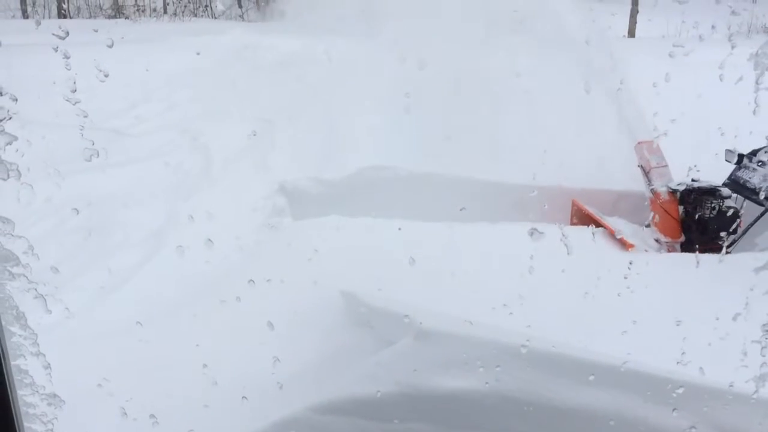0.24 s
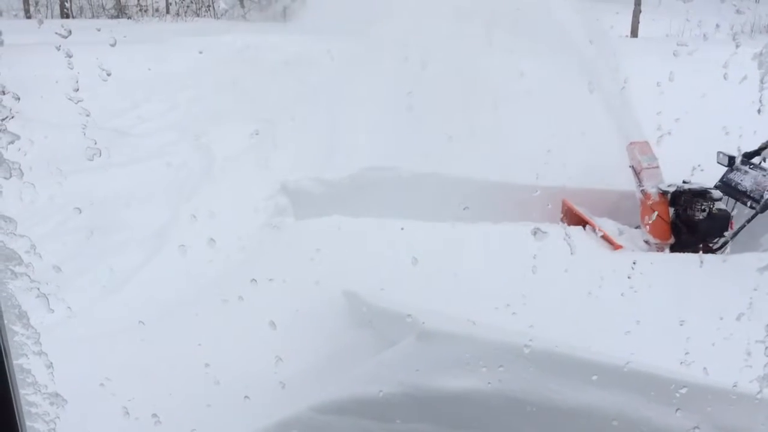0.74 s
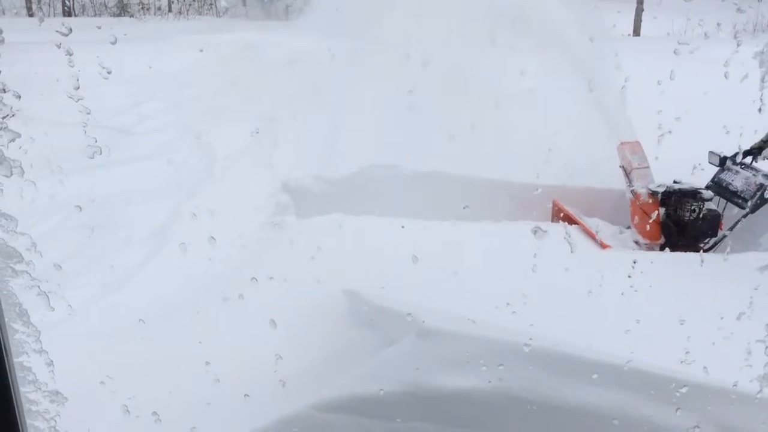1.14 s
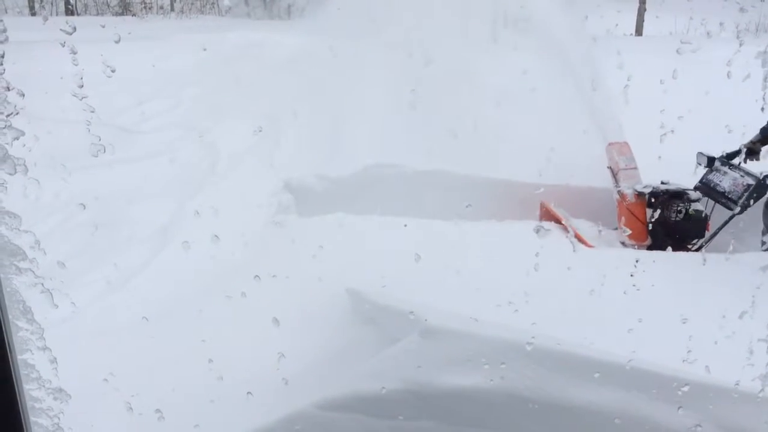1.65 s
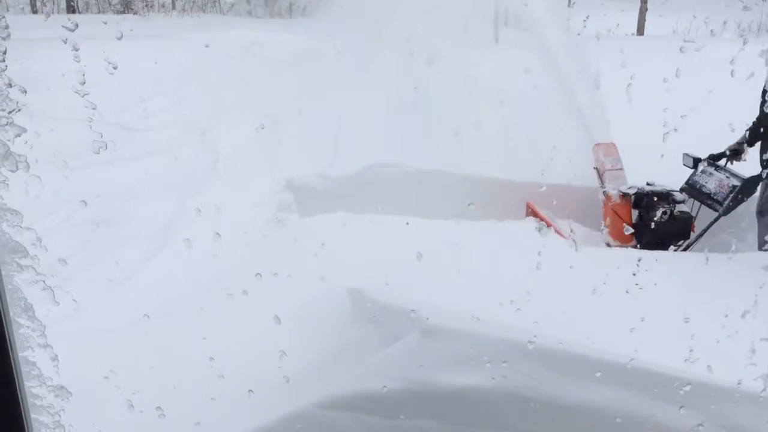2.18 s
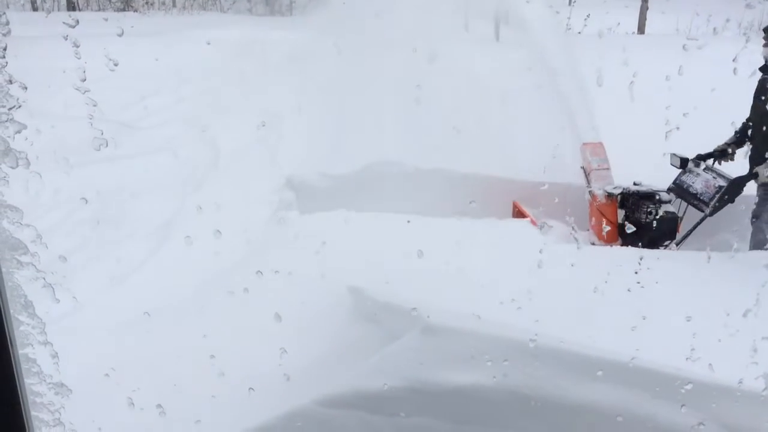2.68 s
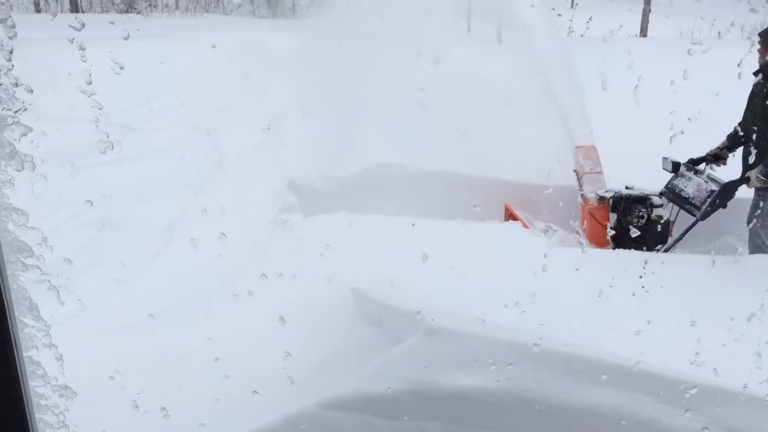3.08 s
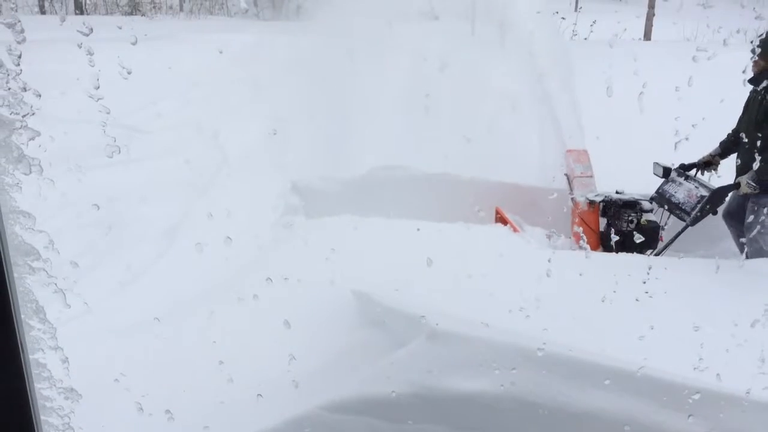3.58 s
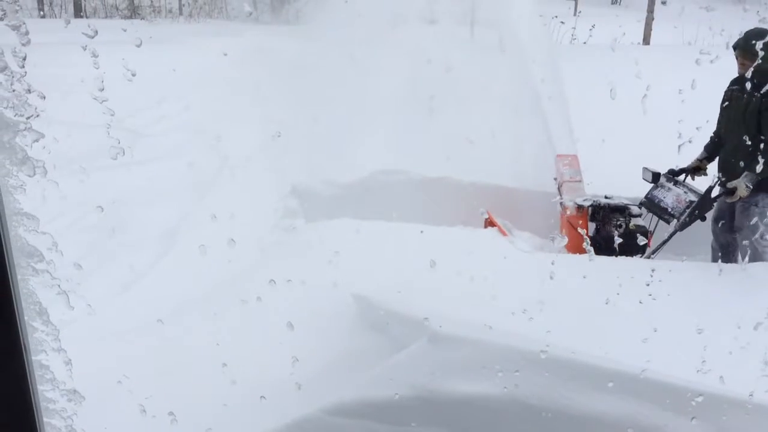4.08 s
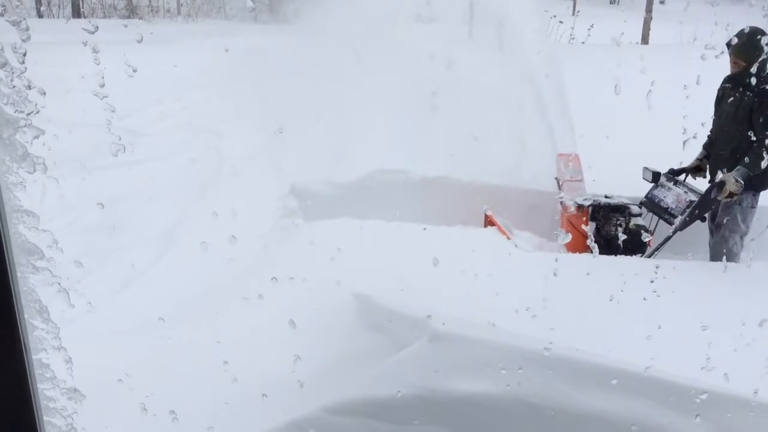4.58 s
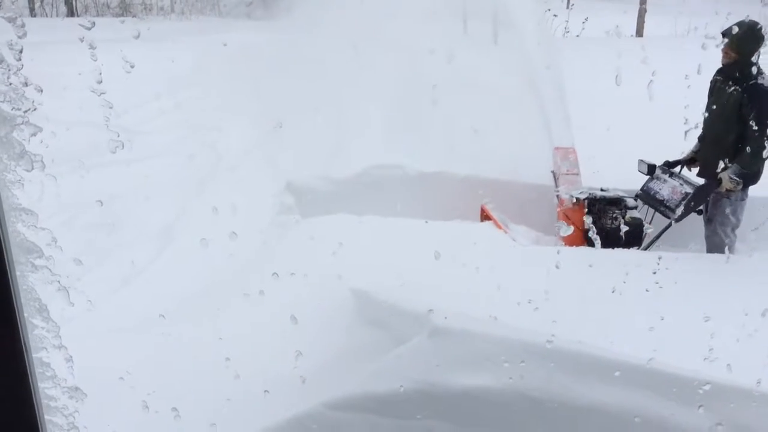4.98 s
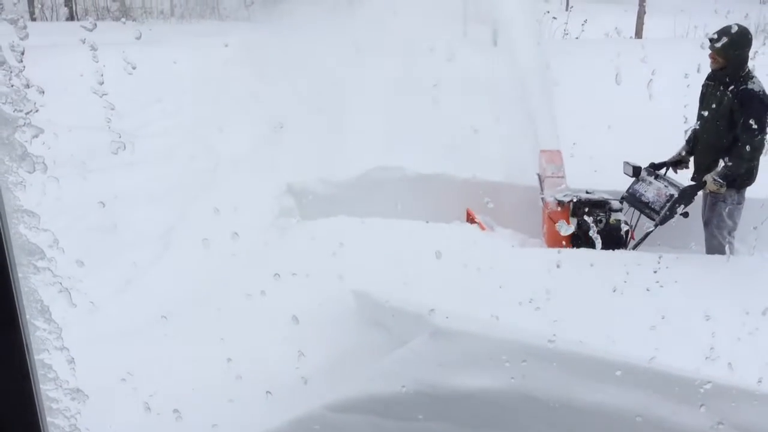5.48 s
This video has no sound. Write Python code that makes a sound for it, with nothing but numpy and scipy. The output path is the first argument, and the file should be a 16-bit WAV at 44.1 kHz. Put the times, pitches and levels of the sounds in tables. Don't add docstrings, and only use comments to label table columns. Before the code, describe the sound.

A bassy, muffled snowblower drones outside a closed window, its rapid firing pulses fluttering slightly in speed. Snow rumbles through its casing, and impeller throb swells as it takes deep bites. Indoors there is soft air hiss, steady electrical hum and a faint high whistle growing midway. Close cloth brushes occur at the start and faintly later, then two quick flicks and an abrupt pop on the handheld microphone finish it.

```python
import sys
import numpy as np
from scipy import signal
from scipy.fft import rfft, irfft
from scipy.io import wavfile

SR = 44100
rng = np.random.default_rng(int(sys.argv[2]) if len(sys.argv) > 2 else 0)


def digitize_waveform(pressure):
    field = np.atleast_2d(pressure).T
    bounded = np.clip(field, -1, 1)
    quanta = np.round(bounded * 32767).astype(np.int16)
    wavfile.write(sys.argv[1], SR, quanta)


def makeup_ratio(level_db):
    decades = np.asarray(level_db, float) / 20
    return 10 ** decades


N = 253134
T = np.arange(N) / SR
HZ = np.fft.rfftfreq(N, 1 / SR) + 1e-3

# pitch_hz, level_db (per Hz)
AIR_HISS = [(2000, -4), (2470, -8), (3500, -5.5), (4170, -11.5), (5550, -15.5), (7100, -22.5),
            (8250, -13.5), (9360, -14), (10800, -20.5), (12300, -23), (13200, -30), (13900, -30),
            (14600, -41), (15400, -44)]
# pitch_hz, width_hz, level_db
WHINES = [(340, 3, -75), (360, 3, -81), (559, 7, -74), (824, 8, -82), (1043, 6, -87), (1114, 8, -84),
          (2007, 4, -86), (2230, 5, -94), (3510, 5, -95), (4404, 5, -101)]
# start_s, length_s, pitch_hz, width_hz, level_db
RUSTLES = [
    (0.0, .03, 9000, 4000, -80),
    (.078, .04, 9300, 3500, -75.5),
    (.082, .03, 4800, 2600, -77),
    (.12, .04, 8800, 4500, -78),
    (1.62, .03, 11000, 5000, -88),
    (3.128, .035, 12800, 5000, -87.5),
    (3.13, .03, 5500, 2500, -86),
    (5.562, .012, 9800, 3000, -78),
    (5.6, .012, 10000, 5000, -82),
]
# pitch_hz, level_db (per Hz)
ROAR = [(12, -43), (33, -29), (46, -7), (67, -16), (90, -7.5), (140, -14), (200, -12.5), (320, -21),
        (350, -24.5), (560, -24.5), (700, -27), (1160, -30.5), (1290, -33.5), (3100, -46)]
# pitch_hz, width_hz, level_db
CASING_RINGS = [(96.7, 10, -67.5), (132, 8, -66.5), (171.2, 13, -64.5), (229.3, 14, -72.5),
                (268, 19, -73.5), (301.3, 17, -71), (337, 9, -76.5), (426.3, 15, -74.5), (521, 11, -82),
                (615, 40, -73.5), (666, 22, -81.5), (738, 41, -81.5), (920, 14, -88), (938, 16, -86),
                (1185, 12, -86.5), (1210, 15, -91), (1400, 25, -82.5), (1525, 25, -83), (1950, 36, -89),
                (3753, 36, -87), (4330, 120, -95.5)]
# time_s, blade_rate_hz
IMPELLER_SPEED = [(0.0, 41.6), (0.8, 42.1), (1.3, 40.23), (2.0, 39.8), (2.5, 41.0), (3.6, 41.8),
                  (4.0, 41.5), (4.8, 43.1), (5.74, 43.7)]
# start_s, length_s, blade_level_db, double_level_db
BITES = [
    (1.7, 0.9, -70, -57),
    (2.2, 1.2, -65, -59.5),
    (3.001, 1.64, -62.5, -57),
    (4.952, 0.69, -63, -65),
]
# pitch_hz, width_hz, start_level_db, end_level_db
MUFFLER_SHELL = [(8280, 200, -1.5, -11), (9050, 140, 0.5, -4), (9650, 160, 0, -10.5), (10370, 180, -8, -8),
                 (11880, 370, -13, -4), (12150, 190, -7, -14)]
# place_in_cycle (0-1), level_db
VALVE_TICKS = [
    (.13, -101),
    (.27, -99),
    (.52, -97),
]
# time_s, firing_rate_hz
ENGINE_SPEED = [(0.0, 25.63), (0.2, 26.0), (0.6, 25.52), (0.8, 24.97), (1.4, 24.45), (1.8, 25.57),
                (2.0, 25.69), (2.4, 25.49), (2.8, 25.57), (3.0, 25.76), (3.4, 25.71), (4.0, 24.91),
                (4.4, 25.19), (5.0, 26.64), (5.2, 26.74), (5.6, 26.19), (5.74, 26.83)]
# multiple, top_level_db, pitch_hz, width_hz
STRONG_ORDERS = [(2, -54.5, 53.8, 4), (4, -58, 101, 24), (6, -57.5, 152.5, 14)]
# multiple, level_db
WEAK_ORDERS = [(1, -78), (3, -68), (5, -66.5), (7, -70), (8, -81), (9, -72), (10, -72), (11, -75),
               (12, -73), (13, -76), (15, -87), (17, -86), (20, -85), (21, -85), (23, -84)]
# pitch_hz, width_hz, lift_db
PANE = [(80, 4, 6), (174, 11, 7), (222, 11, 12), (271, 8, 11.5)]
# pitch_hz, level_db
MICROPHONE = [(12300, 0), (13200, -3), (13900, 1.5), (14600, -2), (16000, -2.5)]


def level(x, db):
    return x * makeup_ratio(db) / np.sqrt(np.mean(x ** 2))


def curve(table):
    time_s, value = np.transpose(table)
    return np.interp(T, time_s, value)


def noise(gain):
    return level(irfft(rfft(rng.standard_normal(N)) * gain, N), 0)


def resonance(hz, width_hz):
    return 1 / np.sqrt(1 + ((HZ - hz * hz / HZ) / width_hz) ** 2)


def walk(rate_hz):
    return noise(np.exp(-(HZ / rate_hz) ** 2))


def flickering_noise(spectrum, low_hz, high_hz, flicker_db, rate_hz):
    hz, db = np.transpose(spectrum)
    shape = makeup_ratio(np.interp(np.log(HZ), np.log(hz), db))
    out = 0
    for centre in np.arange(np.log2(low_hz), np.log2(high_hz) + .5, .5):
        share = np.cos(np.pi * np.clip(np.log2(HZ) - centre, -.5, .5))
        band = irfft(rfft(rng.standard_normal(N)) * shape * share, N)
        out = out + band * makeup_ratio(flicker_db * walk(rate_hz))
    return level(out, 0)


def indoors():
    hum_level = makeup_ratio(-55.5 + 0.33 * walk(0.86))
    out = hum_level * np.sqrt(2) * np.cos(2 * np.pi * 120.064 * T + .6)
    for hz, width, db in WHINES:
        loudness = makeup_ratio(db + 2.4 * walk(2 * width))
        drift = 1.33 * walk(width / 2)
        out = out + loudness * np.sqrt(2) * np.sin(2 * np.pi * hz * T + drift)
    whistle = noise(resonance(10379, 30) + resonance(10418, 30))
    sets_in = np.clip((T - 2.2) / 1.1, .15, 1)
    air = flickering_noise(AIR_HISS, 1955, 16000, 1.0, 17)
    return out + makeup_ratio(-93) * sets_in * whistle + level(air, -75.5)


def rustles():
    out = 0
    for start, length, hz, width, db in RUSTLES:
        progress = np.clip((T - start) / length, 0, 1)
        stroke = np.sin(np.pi * progress ** 0.52)
        grain = makeup_ratio(4.9 * walk(150))
        out = out + makeup_ratio(db) * stroke * grain * noise(resonance(hz, width) ** 2)
    return out


def finger_pop():
    since = T - 5.64995
    after = np.maximum(since, 0)
    press = .031 * np.clip(1 + since / .0072, 0, 1) ** .7
    wobble = .38 * np.exp(-after / .0012) * np.cos(2 * np.pi * 900 * (after - .00042))
    suck = .052 * (np.clip(1 - after / .0056, 0, 1) + wobble)
    snap = 1 - np.exp(-np.maximum(since + .00003, 0) / .00018)
    tick_shape = np.exp(-((since + .00002) / .00008) ** 2)
    tick = makeup_ratio(-35.5) * tick_shape * np.cos(2 * np.pi * 8000 * (since + .00003))
    knock = makeup_ratio(-50.5) * np.exp(-(since / 0.00045) ** 2) * np.sin(-2 * np.pi * 2000 * since)
    return press * (1 - snap) - suck * snap + tick + knock


def snow_roar(cycle):
    swell = 1 + .12 * np.cos(2 * np.pi * (cycle - .02))
    out = level(flickering_noise(ROAR, 16.12, 2900, 1.0, 9) * swell, -59)
    for hz, width, db in CASING_RINGS:
        out = out + makeup_ratio(db + walk(11)) * noise(resonance(hz, width))
    return out


def impeller_blades():
    attack_s, release_s = 0.27, 0.24
    blade = 2 * np.pi * np.cumsum(curve(IMPELLER_SPEED)) / SR
    first, second = makeup_ratio(-75.5), makeup_ratio(-77)
    for start, length, first_db, second_db in BITES:
        filling = (T - start) / attack_s
        emptying = (start + length - T) / release_s
        full = np.clip(np.minimum(filling, emptying), 0, 1) ** 2
        first = np.maximum(first, makeup_ratio(first_db) * full)
        second = np.maximum(second, makeup_ratio(second_db) * full)
    return np.sqrt(2) * (first * np.sin(blade) + second * np.sin(2 * blade))


def puffs(cycle, opens, sharp, tail, tail_db, scatter_db):
    since = (cycle - opens) % 1
    sizes = makeup_ratio(scatter_db * rng.standard_normal(N // 1000))
    size = sizes[(cycle - opens + 2).astype(int)]
    rise = 1 - np.exp(-since / .012)
    return size * rise * (np.exp(-since / sharp) + makeup_ratio(tail_db) * np.exp(-since / tail))


def exhaust(cycle):
    cycle = cycle + 0.0088 * walk(7.9)
    opens = .88
    hiss_colour = resonance(9000, 2600) ** 2 + makeup_ratio(-12) * resonance(12000, 1800) ** 2
    gas = puffs(cycle, opens, 0.068, 0.36, -14, 1.1) * noise(hiss_colour)
    for hz, width, start_db, end_db in MUFFLER_SHELL:
        turn = makeup_ratio(np.linspace(start_db, end_db, N))
        gas = gas + turn * puffs(cycle, opens, 0.081, 0.51, -16, 3.0) * noise(resonance(hz, width))
    ticks = 0
    for place, db in VALVE_TICKS:
        tick = puffs(cycle, place, .06, .1, -30, 4.0) * noise(resonance(10900, 2500) ** 2)
        ticks = ticks + level(tick, db)
    rattle = puffs(cycle, 0.98, .15, 0.36, -5.0, 1.7) * noise(resonance(4640, 2300) ** 2)
    hiss_db = -84.5 + 0.93 * T
    return level(gas, -4.5) * makeup_ratio(hiss_db) + ticks + level(rattle, -91.5)


def engine_thuds(rate, cycle):
    orders = list(WEAK_ORDERS)
    for k, top_db, hz, width in STRONG_ORDERS:
        off_peak = 2 * (k * rate - hz) / width
        orders.append((k, top_db - 20 * np.log10(1 + off_peak ** 2)))
    out = 0
    for k, db in orders:
        lift_db = sum(lift / (1 + (2 * (k * rate - hz) / width) ** 2) for hz, width, lift in PANE)
        lag = .8 * (k < 4) * (1 + k % 2)
        lead = (k > 7) * (.6 * (k - 5.5) + .14 * k * (rate - 25.6))
        phase = 2 * np.pi * k * cycle - lag + lead + .012 * k * walk(6)
        waver = makeup_ratio(.7 * walk(7))
        out = out + makeup_ratio(db + lift_db) * np.sqrt(2) * waver * np.cos(phase)
    return out


def snowblower():
    rate = curve(ENGINE_SPEED)
    cycle = -.2016 + np.cumsum(rate) / SR
    return snow_roar(cycle) + impeller_blades() + exhaust(cycle) + engine_thuds(rate, cycle)


def scene():
    return (indoors() + rustles() + finger_pop() + snowblower())[None]


def band_limit(x):
    return signal.sosfilt(signal.butter(12, 15290, fs=SR, output="sos"), x)


def record(dry):
    hz, db = np.transpose(MICROPHONE)
    heard = irfft(rfft(dry) * makeup_ratio(np.interp(HZ, hz, db)), N)
    return band_limit(heard)


dry = scene()
out = record(dry)
digitize_waveform(out)
```